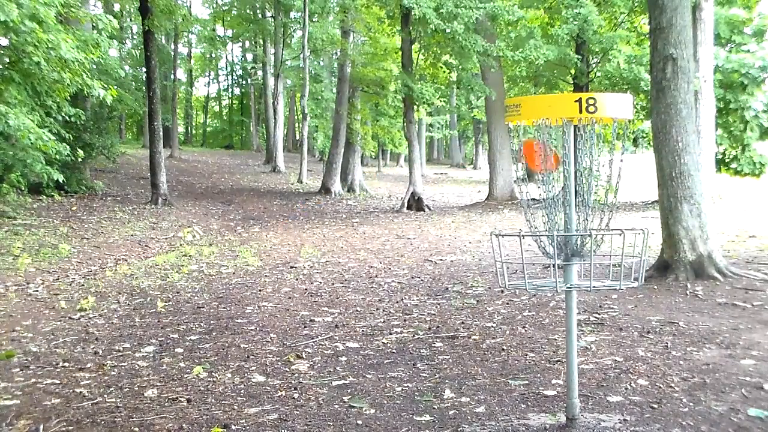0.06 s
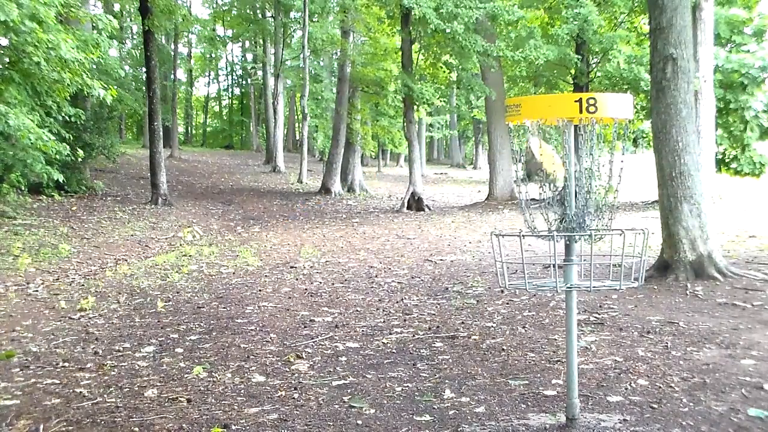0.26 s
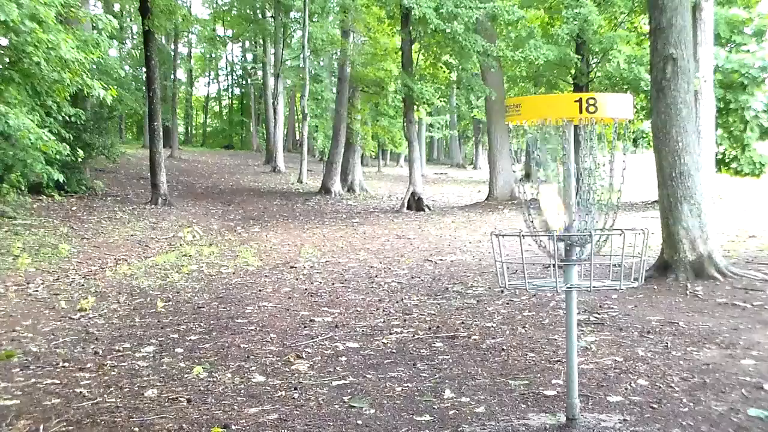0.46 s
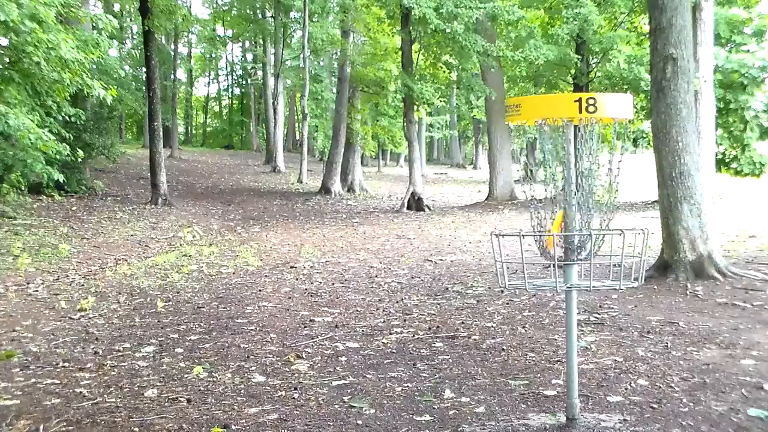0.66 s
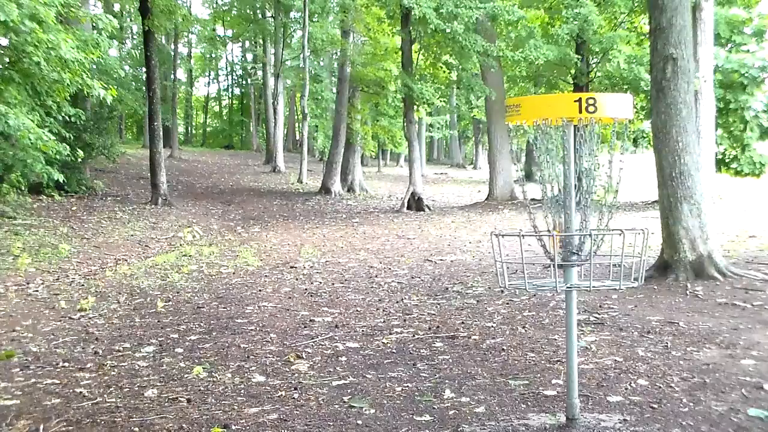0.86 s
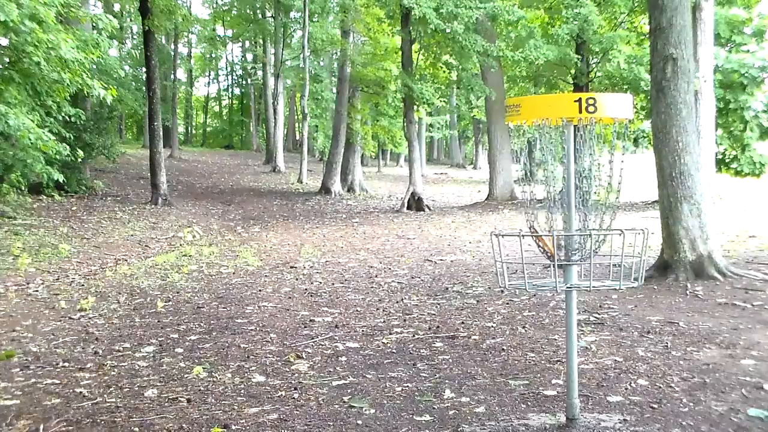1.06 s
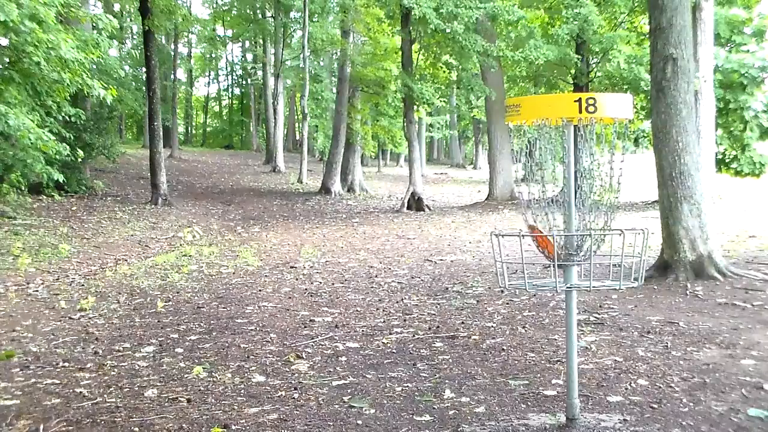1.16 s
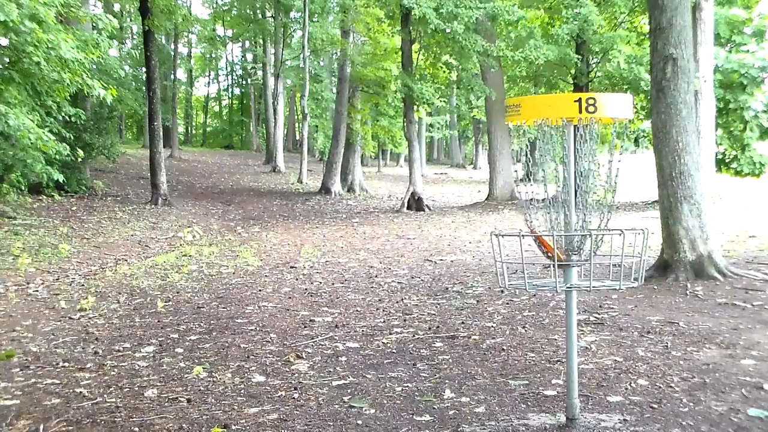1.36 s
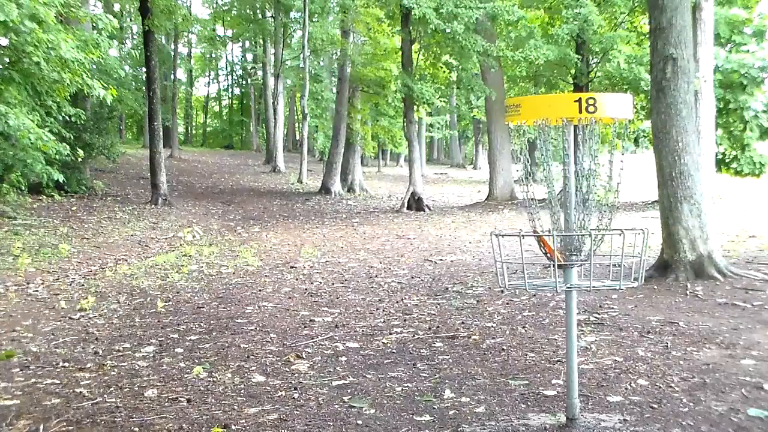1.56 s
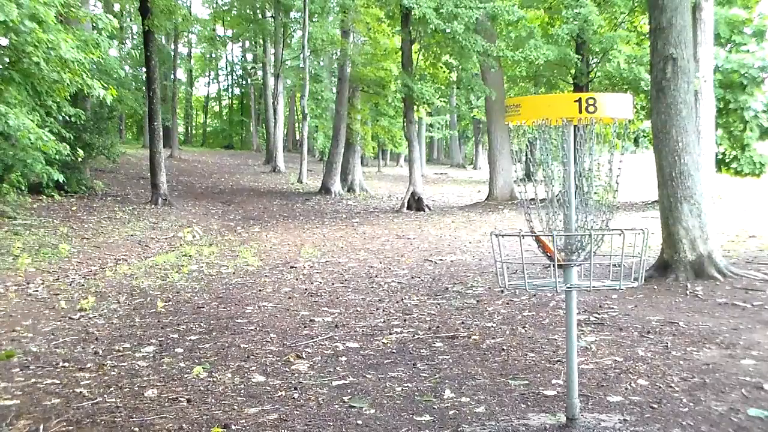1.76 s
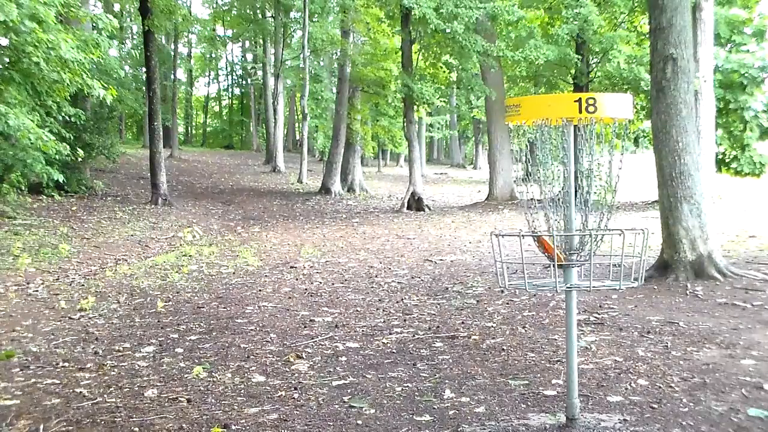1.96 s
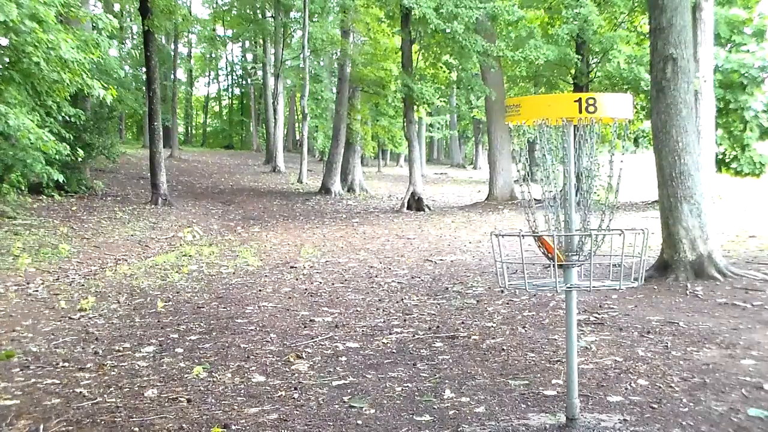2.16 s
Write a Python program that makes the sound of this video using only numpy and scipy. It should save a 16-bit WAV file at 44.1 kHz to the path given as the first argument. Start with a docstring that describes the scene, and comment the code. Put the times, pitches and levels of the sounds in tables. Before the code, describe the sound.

A plastic flying disc crashes into the hanging chains of a steel basket. The chains jingle brightly, swell again as they swing back, then fade in small clinks as the disc settles. Faint leaves, insects and wind lie behind.

```python
"""In a quiet wood, a plastic flying disc crashes into the hanging chains of a steel basket.
Each impact excites damped natural modes: held links click, loose links jingle as the chains swing
out and fall back, and the rings that gather them chime and beat. The disc drops into the wire tray
and settles. Trees scatter the sound, over faint leaves, insects and wind."""
import sys
import numpy as np
from scipy import signal
from scipy.fft import rfft, irfft
from scipy.io import wavfile

SR = 44100
rng = np.random.default_rng(int(sys.argv[2]) if len(sys.argv) > 2 else 0)


def master(y):
    """Save y as 16-bit WAV."""
    cut = np.clip(np.atleast_2d(y).T, -1, 1)
    pcm = np.round(cut * 32767)  # scale
    wavfile.write(sys.argv[1], SR, pcm.astype(np.int16))


N = 97020
T = np.arange(N) / SR


# strength of the chain clatter: t/s, level/dB
CLATTER_LEVEL = [(.222, -27.5), (.27, -27), (.367, -43.5), (.48, -46.5), (.54, -46.5), (.609, -30.5),
                 (.691, -31), (.703, -29.5), (.747, -31.5), (.795, -41), (.857, -34.5), (.989, -39.5),
                 (1.165, -39.5), (1.205, -33), (1.379, -43), (1.517, -42), (1.571, -46.5), (1.75, -53.5),
                 (1.872, -52), (1.879, -39.5), (1.94, -41), (2.005, -50), (2.2, -52.5)]
# spectrum of a click between links: f/Hz, level/dB
CLICK_SPECTRUM = [(100, -55), (280, -10), (520, -8), (880, -5), (1200, -9), (1750, 3.5), (2200, -1.5),
                  (2650, -1), (3150, -4.5), (3650, -2), (4200, 0), (5000, 4.5), (5800, -4.5), (6900, 0.5),
                  (8000, -5), (10700, -3.5), (14000, 3)]

def clatter(count=32, clicks_per_s=1200, t60=0.022):
    """Contact damping: links held by their neighbours click with hardly any ring."""
    out = np.zeros(N)
    for _ in range(count):
        click = noise(CLICK_SPECTRUM, size=2048) * decay(T[:2048], t60)
        out += signal.oaconvolve(contacts(clicks_per_s / count, spread_db=3), click)[:N]
    return unit(out) * level(CLATTER_LEVEL)


# families of link modes: centre f/Hz, scatter/Hz, relative level/dB, T60/s
LINK_MODES = [(11950, 125, -4.5, 0.16), (11710, 84.7, -8, 0.2), (12520, 230, -6.5, 0.1),
              (13400, 490, -23, 0.055), (5230, 470, -17, 0.12), (4513, 50.5, -13.5, 0.15)]
# ringing of the shaken links: t/s, level/dB
JINGLE_LEVEL = [(.222, -29.5), (.28, -26.5), (.36, -32.5), (.47, -45.5), (.54, -35.5), (.61, -23),
                (.67, -30.5), (.72, -24), (.82, -32), (.88, -26.5), (.99, -39), (1.16, -38), (1.22, -32),
                (1.38, -42.5), (1.49, -43), (1.6, -41.5), (1.74, -51.5), (1.86, -55), (1.885, -37),
                (1.96, -41.5), (2.02, -51), (2.2, -50)]
# lingering fine ring: t/s, level/dB
FINE_RING_LEVEL = [(.54, -52), (.7, -45.5), (1.22, -48), (1.83, -65), (1.9, -42), (2.03, -59.5)]

def jingle():
    """Free vibration: shaken links ring, and one fine ring lingers as the chains settle."""
    shaken = sum(amp(db) * links(hz, scatter_hz, t60) for hz, scatter_hz, db, t60 in LINK_MODES)
    fine_ring = links(centre_hz=9000, scatter_hz=119, t60=0.13)
    return shaken * level(JINGLE_LEVEL) + fine_ring * level(FINE_RING_LEVEL)


def links(centre_hz, scatter_hz, t60, count=20):
    """Superposition: randomly struck links each ring at a slightly different natural frequency."""
    offsets = 2 * (np.arange(count) + rng.random(count)) / count - 1
    pitches = centre_hz + np.sqrt(3) * scatter_hz * offsets
    return unit(sum(mode(contacts(per_s=24, spread_db=5), hz, t60).imag for hz in pitches))


# single loud clinks: t/s, centre f/Hz, level/dB
CLINKS = [(0.606, 11800, -26), (0.948, 11950, -30.5), (1.203, 9000, -39), (1.516, 12080, -29.5),
          (1.603, 11950, -32.5), (1.688, 11950, -35), (1.878, 9150, -39.5), (2.056, 12270, -38.5)]

def clinks(count=10, spread=0.045, smear_s=0.0027, t60=0.12):
    """Interference: links of unlike pitch, struck almost together, sum to one shimmering clink."""
    out = np.zeros(N)
    for s, centre_hz, db in CLINKS:
        place, delay, phase = rng.random((3, count, 1))
        offsets = 2 * (np.arange(count)[:, None] + place) / count - 1
        hz = centre_hz * (1 + spread * offsets)
        t = T[:SR // 2] - smear_s * delay
        partials = np.sin(2 * np.pi * (hz * t + phase)) * decay(t, t60) * (t > 0)
        add(out, s, amp(db) * np.sqrt(2 / count) * partials.sum(0))
    return out


# sharp blows of chain on steel: t/s, level/dB, T60/s
CLASHES = [(.2205, -18, 0.029), (.701, -26.5, 0.33), (1.222, -28, 0.093), (1.267, -30, 0.037),
           (1.503, -37, 0.051), (1.7705, -34, 0.057), (1.868, -37, 0.075)]
# their spectrum: f/Hz, level/dB
CLASH_SPECTRUM = [(300, -85), (2800, -6), (3700, -3.5), (4500, 15.5), (5500, 6.5), (6200, 6), (7100, 6),
                  (8000, -8), (11000, -2), (14000, 4)]

def clashes():
    """Impulsive excitation: the brief contact of chain on steel drives high modes."""
    return blows(CLASHES, CLASH_SPECTRUM)


LOW_RING, MID_RING, HIGH_RING, SMALL_RING = 4448, 4480.5, 4518, 4593  # f/Hz
# blows on the gathering rings: t/s, f/Hz, level/dB, overtone level/dB, T60/s, time until damped/s
RING_BLOWS = [(.222, SMALL_RING, -52, -45, .9, 0.085), (0.241, MID_RING, -31.5, -52, 0.42, 0.096),
              (0.278, LOW_RING, -28, -45, 0.99, 0.057), (0.299, LOW_RING, -30.5, -47, 0.83, 0.034),
              (0.347, LOW_RING, -43.5, -41, 0.66, 0.093), (0.602, LOW_RING, -51, -38, 0.54, .1),
              (0.609, MID_RING, -31, -47, 0.36, 0.069), (0.71, HIGH_RING, -36.5, -47, 0.67, 0.078),
              (0.715, LOW_RING, -32.5, -36, 0.99, 0.13), (0.749, MID_RING, -22, -57, 0.37, 0.46),
              (0.858, LOW_RING, -34, -43, 1, .32), (1.177, MID_RING, -32, -42, 0.5, 0.022),
              (1.202, LOW_RING, -34, -21, 0.14, 0.058), (1.209, MID_RING, -42.5, -53, 1, .28),
              (1.291, LOW_RING, -42, -37, 0.61, 0.26), (1.498, MID_RING, -37, -64, 0.31, 0.17),
              (1.502, HIGH_RING, -39.5, -68, 0.16, .15), (1.769, LOW_RING, -43, -46, 0.68, 0.2),
              (1.875, MID_RING, -45, -64, 0.55, .3)]

def rings(overtone_ratio=2.7907, rise_s=0.00026, damp_s=0.0012):
    """Beats: rings of close pitch chime together, each in two modes, until a chain damps them."""
    out = np.zeros((2, N))
    for s, hz, db, overtone_db, t60, free_s in RING_BLOWS:
        t = np.maximum(T - s, 0)
        envelope = (1 - np.exp(-t / rise_s)) * decay(t, t60)
        damping = np.exp(-np.maximum(t - free_s, 0) / damp_s)
        fundamental = amp(db) * np.sin(2 * np.pi * hz * T)
        overtone = amp(overtone_db) * np.sin(2 * np.pi * hz * overtone_ratio * T)
        chime = np.sqrt(2) * envelope * damping * (fundamental + overtone)
        out += stereo(chime, pan_db=2.5 if hz == LOW_RING else -4)
    return out


# knocks of the disc: t/s, level/dB, T60/s
KNOCKS = [(.149, -43.5, 0.015), (.2207, -20, 0.037), (.225, -31.5, 0.32), (.238, -27.5, 0.11),
          (1.203, -37.5, 0.036), (1.281, -32.5, 0.016), (1.456, -43.5, 0.042)]
# their spectrum: f/Hz, level/dB
DISC_SPECTRUM = [(80, -35), (250, -23), (430, -3), (720, -3.5), (1100, -4), (1750, 4), (2500, -2),
                 (3800, -3), (7000, -2), (14000, -9)]

def knocks():
    """Broadband excitation: a hard knock of the disc sets many modes going at once."""
    return blows(KNOCKS, DISC_SPECTRUM)


# soft bumps of the disc: t/s, level/dB, T60/s
THUDS = [(.241, -35.5, 0.086), (.679, -45.5, 0.15), (.785, -39.5, 0.029), (.835, -39.5, 0.031),
         (.904, -48, 0.066), (1.2, -42, 0.092), (1.878, -53, 0.18)]
# low, hollow notes of the disc and basket: f/Hz, relative level/dB
HOLLOW_NOTES = [(390, -9.5), (585, -3), (715, -5.5), (870, -1.5)]

def thuds(rise_s=0.0016):
    """Compliant contact: disc and basket sound low, hollow notes as the disc bumps in the tray."""
    out, t = np.zeros(N), T[:SR // 2]
    for s, db, t60 in THUDS:
        body = sum(amp(note_db) * np.sin(2 * np.pi * (hz * t + rng.random()))
                   for hz, note_db in HOLLOW_NOTES)
        add(out, s, amp(db) * body * (1 - np.exp(-t / rise_s)) * decay(t, t60))
    return out


# clanks of single basket wires: t/s, f/Hz, level/dB
WIRE_CLANKS = [(.221, 1790, -28.5), (.2215, 5230, -28), (.703, 3490, -39), (1.6, 1790, -47.5),
               (1.771, 3714, -47.5), (1.878, 3714, -40)]

def wires(t60=0.092):
    """Damped oscillation: a wire, hit squarely, clanks at its natural frequency."""
    out, t = np.zeros(N), T[:SR // 2]
    for s, hz, db in WIRE_CLANKS:
        add(out, s, amp(db) * np.sqrt(2) * np.sin(2 * np.pi * hz * t) * decay(t, t60))
    return out


# modes of the basket frame: f/Hz, relative level/dB, T60/s
FRAME_MODES = [(536, -5, 0.11), (875, -2.5, 0.069), (1771, -1, 0.15), (2490, 1.5, 0.22), (3490, 4.5, 0.41),
               (3715, 5, 0.05), (5230, 0, 0.1), (6660, 6, 0.1)]

def frame(drive, level_db=-52):
    """Resonance: the welded frame rings along with whatever strikes it."""
    ringing = sum(amp(db) * unit(mode(drive, hz, t60).real) for hz, db, t60 in FRAME_MODES)
    return amp(level_db) * unit(ringing)


# share that differs between left and right: f/Hz, level/dB
SIDE_SPECTRUM = [(3400, -40), (4800, -5), (13000, -6.5)]

def scattered(x, t60=0.16, size=3072):
    """Decorrelation: links hang all round the pole, so their treble differs from left to right."""
    paths = rng.standard_normal(size) * decay(T[:size], t60)
    response = rfft(paths / np.linalg.norm(paths), N)
    share = amp(at_frequency(SIDE_SPECTRUM, np.fft.rfftfreq(N, 1 / SR)))
    side = irfft(rfft(x) * response * share, N)
    return stereo(x) + np.array([side, -side]) * (T > size / SR)


# reverberation time among the trees: f/Hz, T60/s
WOOD_T60 = [(200, 0.43), (2000, 0.11), (6000, 0.88), (14000, 0.7)]

def tree_echoes(x, echoes_per_s=1500, gap_s=0.006, gain_db=-29.5):
    """Scattering: trunks and ground return a thin tail of echoes."""
    arrivals = (rng.random((2, SR)) < echoes_per_s / SR) * (T[:SR] > gap_s)
    mid, side = rng.standard_normal((2, SR)) * arrivals
    hz, t, spectra = signal.stft(np.array([mid + .3 * side, mid - .3 * side]), SR, nperseg=256)
    tail = signal.istft(spectra * decay(t, at_frequency(WOOD_T60, hz)[:, None]), SR)[1]
    return amp(gain_db) * signal.fftconvolve(x, tail / np.linalg.norm(tail[0]), axes=1)[:, :N]


# spectrum of leaves and insects: f/Hz, level/dB
LEAF_INSECT_SPECTRUM = [(20, -50), (200, 2.5), (520, 0), (900, -1), (1500, -5.5), (2600, -6), (4500, -12),
                        (5350, 1), (5900, -13), (14000, -18.5)]
# spectrum of wind on the microphone: f/Hz, level/dB
WIND_SPECTRUM = [(8, -4.5), (30, -1), (45, -5.5), (75, -10), (120, -12), (180, -18.5), (1000, -69)]
# the background dips during the crash and comes back: t/s, relative level/dB
BACKGROUND_LEVEL = [(0, 0.5), (.22, 2), (.26, -8), (.52, -12.5), (.7, -7), (1.1, 2.5), (2.2, 1.5)]

def background():
    """Incoherent sources: leaves, a thin band of insects and low wind add up as noise."""
    leaves_and_insects = amp(-57) * wide_noise(LEAF_INSECT_SPECTRUM, width=0.33)
    wind = amp(-49.5) * wide_noise(WIND_SPECTRUM, width=0.39)
    return level(BACKGROUND_LEVEL) * (leaves_and_insects + wind)


def blows(table, spectrum):
    """Modal overlap: the dense modes excited by each blow merge into decaying noise."""
    out = np.zeros(N)
    for s, db, t60 in table:
        burst = noise(spectrum, size=8192)
        add(out, s, amp(db) * burst * decay(T[:len(burst)], t60))
    return out


def contacts(per_s, spread_db):
    """Poisson process: random contacts, a few much harder than the rest."""
    struck = rng.random(N) < per_s / SR
    hardness = np.minimum(rng.exponential(1, N), 3)
    return struck * amp(spread_db * hardness) * rng.choice([-1, 1], N)


def mode(drive, hz, t60):
    """Complex response of a damped resonator."""
    pole = decay(1 / SR, t60) * np.exp(2j * np.pi * hz / SR)
    return signal.lfilter([1], [1, -pole], drive + 1e-18)


def stereo(x, pan_db=0, delay_s=1e-5):
    """Time and level differences between two close microphones; positive pan is left."""
    half = np.exp(-1j * np.pi * np.fft.rfftfreq(N, 1 / SR) * delay_s) * amp(pan_db / 2)
    return irfft(rfft(x) * np.array([half, 1 / half]), N)


def wide_noise(spectrum, width):
    """Partly coherent stereo noise; width is the ratio of side to mid."""
    mid, side = noise(spectrum, size=N), width * noise(spectrum, size=N)
    return unit(np.array([mid + side, mid - side]))


def noise(spectrum, size):
    """Spectrally shaped noise of rms 1."""
    gain = amp(at_frequency(spectrum, np.fft.rfftfreq(size, 1 / SR)))
    return unit(irfft(rfft(rng.standard_normal(size)) * gain, size))


def at_frequency(points, hz):
    """Interpolation on a log-frequency axis."""
    f, value = np.transpose(points)
    return np.interp(np.log(hz + 1), np.log(f + 1), value)


def level(points):
    """Amplitude envelope from a curve in dB, silent before its first point."""
    s, db = np.transpose(points)
    return amp(np.interp(T, s, db, left=-150))


def decay(t, t60):
    """Exponential decay, 60 dB in t60 seconds."""
    return np.exp(-np.log(1000) * t / t60)


def amp(db):
    """Decibels to amplitude ratio."""
    return 10 ** (np.asarray(db) / 20)


def unit(x):
    """Normalisation to rms 1."""
    return x / np.sqrt(np.mean(x ** 2) + 1e-20)


def add(mix, s, sound):
    """Superposes a sound at time s."""
    part = mix[round(s * SR):][:len(sound)]
    part += sound[:len(part)]


def scene():
    """Superposition of chains, disc and basket, their echoes and the background."""
    hits = clatter() + knocks() + clashes()
    basket = scattered(hits + frame(hits) + jingle() + clinks() + thuds() + wires())
    return basket + tree_echoes(basket) + rings() + background()


def record(dry, cutoff_hz=14200):
    """Band limiting: a steep low-pass removes the highest treble."""
    lowpass = signal.firwin(511, cutoff_hz, window=("kaiser", 8), fs=SR)
    return signal.oaconvolve(dry, lowpass[None], "same", axes=1)


dry = scene()
out = record(dry)
master(out)
```